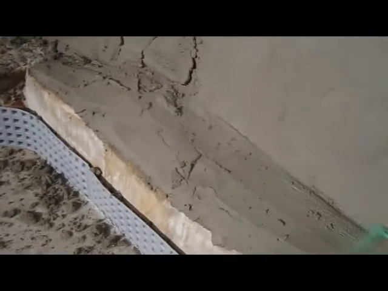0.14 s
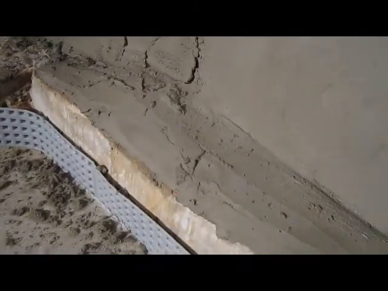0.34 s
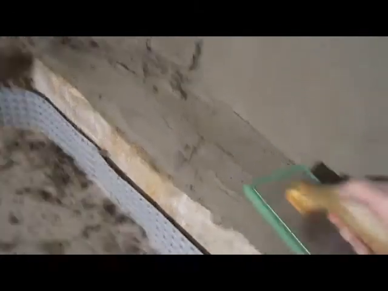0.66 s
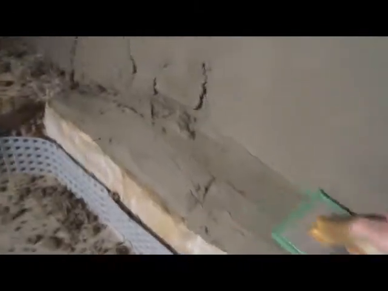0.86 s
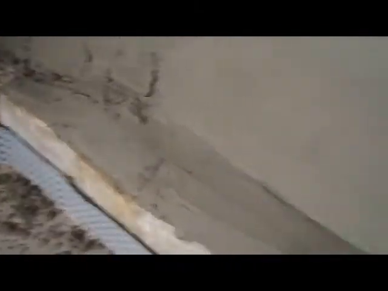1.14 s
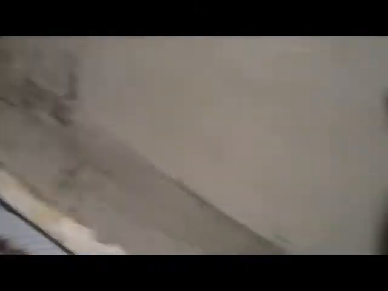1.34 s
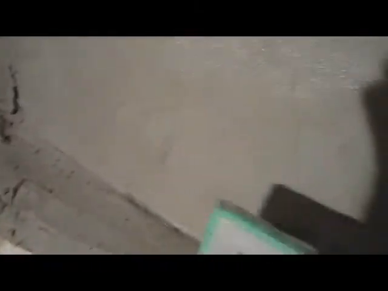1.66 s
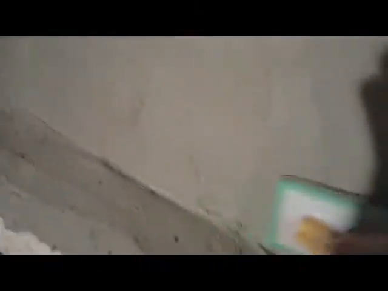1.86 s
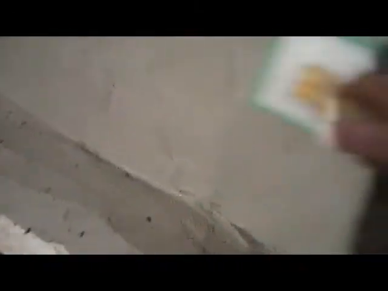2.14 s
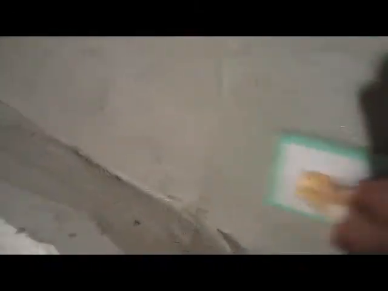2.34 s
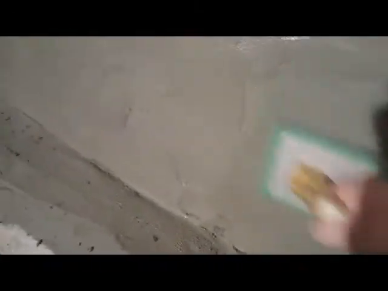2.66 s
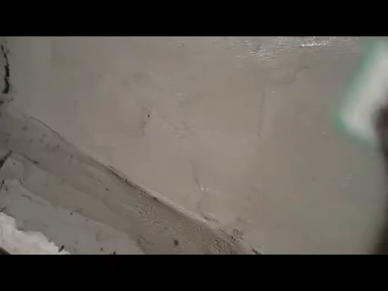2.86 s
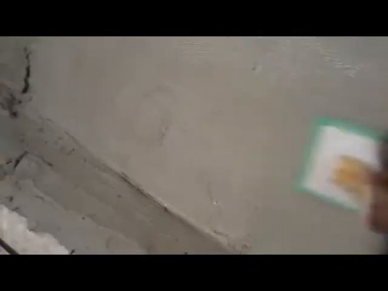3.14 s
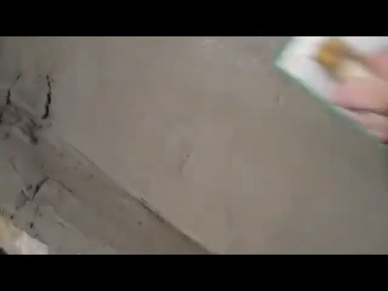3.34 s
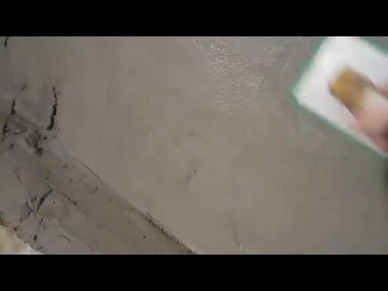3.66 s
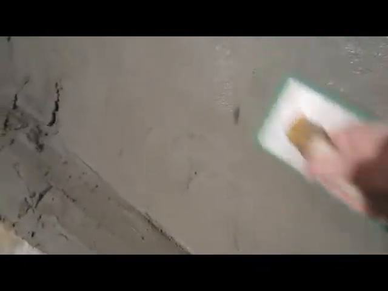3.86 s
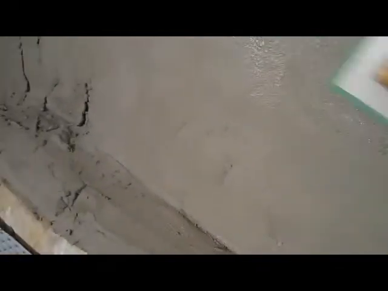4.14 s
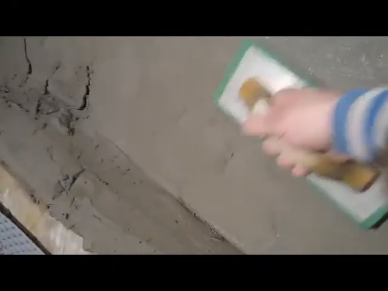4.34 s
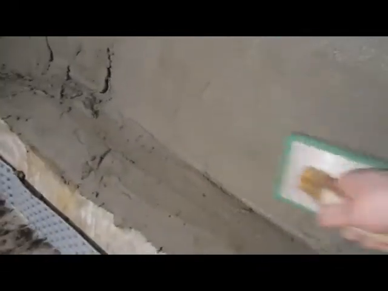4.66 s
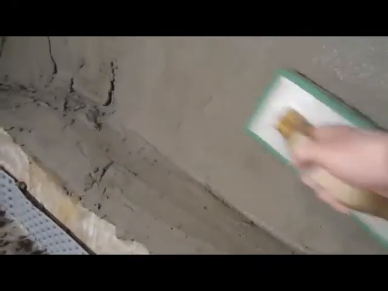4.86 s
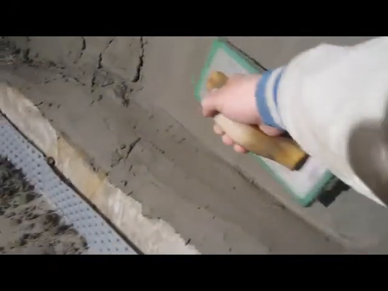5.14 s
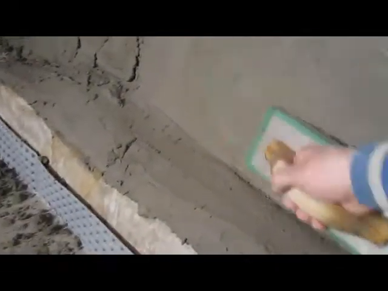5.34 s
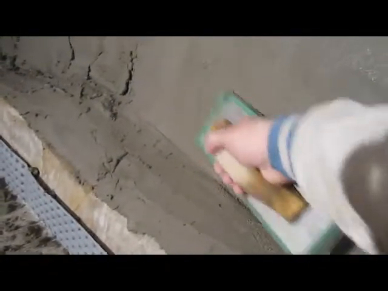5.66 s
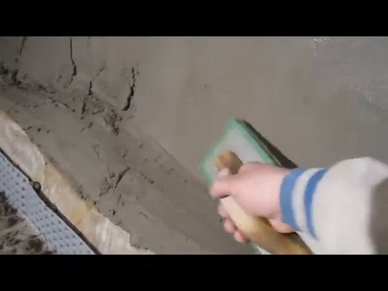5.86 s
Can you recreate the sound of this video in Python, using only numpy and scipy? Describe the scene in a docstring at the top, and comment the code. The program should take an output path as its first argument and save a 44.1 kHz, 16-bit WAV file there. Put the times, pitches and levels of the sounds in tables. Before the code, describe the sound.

Close, sandy rubbing of a float on a cement wall, with light knocks and faint squeaks, then a brief burst of wind buffeting.

```python
"""A basement wall of fresh cement, rubbed in sweeps with a sponge float close to a mono microphone.
Sand grains hiss under the sponge and rattle its plastic plate, which knocks now and then on the wall.
The wet sponge sticks and slips in a faint whistle and brief squeaks; bare walls add a short tail.
Near the end a gust of air buffets the microphone with a loud, dull flutter and two thin ticks."""
import sys
import numpy as np
from scipy import signal
from scipy.fft import rfft, irfft
from scipy.io import wavfile
from scipy.ndimage import map_coordinates

SR = 44100
rng = np.random.default_rng(int(sys.argv[2]) if len(sys.argv) > 2 else 0)


def to_wav(s):
    """Save 16-bit WAV."""
    ch = np.atleast_2d(s).T  # columns
    pcm = np.round(np.clip(ch, -1, 1) * 32767)  # PCM
    wavfile.write(sys.argv[1], SR, pcm.astype(np.int16))


N = 264732
TIME = np.arange(N) / SR


def undb(db):
    """Decibels to gain."""
    return 10 ** (np.asarray(db) / 20)


def unit(x):
    """Scale to rms 1."""
    return x / np.sqrt(np.mean(x ** 2))


def colour(x, points):
    """Filter x by a curve of (Hz, dB) points, to rms 1; clicks keep a sharp front and ring afterwards."""
    hz, db = np.transpose(points)
    freqs = np.maximum(np.fft.rfftfreq(4096, 1 / SR), 1)
    gain = undb(np.interp(np.log(freqs), np.log(hz), db))
    cepstrum = irfft(np.log(gain))
    half = len(cepstrum) // 2
    causal = np.r_[cepstrum[0], 2 * cepstrum[1:half], np.zeros(half)]
    response = irfft(np.exp(rfft(causal)))
    return unit(signal.fftconvolve(x, response)[:N])


def walk(rate):
    """Smooth random drift at rms 1, changing about rate times a second."""
    knots = rng.standard_normal(8192)
    return unit(map_coordinates(knots, [TIME * rate], order=2, mode="wrap"))


def add(out, s, sound):
    """Mix a short sound in at time s."""
    start = int(s * SR)
    out[start:start + len(sound)] += sound[:N - start]


# Spectrum of the basement's still air: (frequency [Hz], relative level [dB])
AIR_SPECTRUM = [(25, 9.5), (80, 4), (160, -1.5), (330, -27), (600, -2), (1200, -3), (4000, -7),
                (12000, -42)]
# Dip of the room tone: (time [s], relative level [dB])
AIR_DIP = [(4.85, 9), (5.1, -23), (5.6, -10.5), (6, 5)]

def room_tone():
    """Still air all around the microphone; it sinks under the gust."""
    gain = undb(-58 + np.interp(TIME, *np.transpose(AIR_DIP)))
    return gain * colour(rng.standard_normal(N), AIR_SPECTRUM)


def swell(t, s, rise_s, fall_s, roundness=1.64):
    """Gain of one sweep of the hand, peaking at time s; roundness 1 is pointed, 2 a bell."""
    away = np.abs(t - s) / np.where(t < s, rise_s, fall_s)
    return np.exp(-np.minimum(away, 10) ** roundness)


# Sweeps of the float, close to the microphone:
# (time of top speed [s], rise [s], fall [s], hiss [dB], rasp [dB], hollow [dB], drag [dB])
FLOAT_STROKES = [(0.197, 0.2, 0.1, -39.0, -43, -47, -45.5), (0.393, 0.349, 0.14, -40, -46.5, -67, -48),
                 (0.64, 0.073, 0.063, -48.5, -48, -49, -41), (0.823, 0.015, 0.13, -52, -63.5, -61, -45.5),
                 (1.07, 0.16, 0.23, -36.5, -43, -53.5, -47.0),
                 (1.305, 0.21, 0.21, -64, -44.5, -65.5, -42.5),
                 (1.388, 0.034, 0.15, -37.5, -26.0, -47.5, -29.5),
                 (1.492, 0.037, 0.059, -32, -30.5, -43, -28),
                 (1.719, 0.029, 0.048, -42.5, -32.5, -38, -29.5),
                 (1.821, 0.056, 0.12, -56, -71, -69.5, -44), (1.977, 0.055, 0.041, -40, -46.0, -53, -47),
                 (2.176, 0.21, 0.14, -35.5, -41.5, -57.5, -47), (2.238, 0.07, 0.41, -34.5, -38, -48, -46.0),
                 (2.545, 0.056, 0.092, -34.5, -52.5, -48.5, -45.5),
                 (2.658, 0.053, 0.13, -34.0, -36, -64, -50.5),
                 (2.79, 0.038, 0.6, -38.5, -56.0, -51.5, -56.5), (3.085, 0.16, 0.11, -33.5, -33, -45, -68),
                 (3.18, 0.046, 0.16, -35, -43, -47, -51.5), (3.391, 0.059, 0.2, -34.5, -37.5, -57, -61),
                 (3.636, 0.17, 0.049, -38.5, -39.5, -46, -53),
                 (4.004, 0.3, 0.096, -34.5, -39.5, -48, -54.5), (4.193, 0.051, 0.068, -38, -43, -44, -48),
                 (4.449, 0.49, 0.23, -35.5, -41, -53, -58), (4.653, 0.064, 0.22, -38.5, -47, -52, -50.5),
                 (4.85, 0.053, 0.25, -47.5, -59, -74, -54), (5.415, 0.25, 0.083, -52, -59, -75, -59),
                 (5.817, 0.072, 0.062, -47, -51.0, -53.5, -53.5),
                 (6.066, 0.16, 0.112, -41, -62, -72.5, -42.0)]

def strokes():
    """Gains of hiss, rasp, hollow and drag follow the hand's speed; overlapping strokes add in power."""
    rows = np.array(FLOAT_STROKES)
    t = TIME[::40]
    speed = np.array([swell(t, *row[:3]) for row in rows])
    return [np.interp(TIME, t, np.sqrt(undb(db) ** 2 @ speed ** 2)) for db in rows[:, 3:].T]


def grains(rate, spread_db):
    """Sand grains catch and slip: random clicks of uneven size, about rate a second."""
    hit = rng.random(N) < rate / SR
    polarity = np.sign(rng.standard_normal(N))
    return hit * polarity * undb(spread_db * np.clip(rng.standard_normal(N), -3, 3))


# Modes of the float's plate: (frequency [Hz], width [Hz], relative level [dB])
PLATE_MODES = [(735, 120, -16), (950, 80, -5.5), (1226, 510, -16), (1480, 200, -18), (2420, 350, -2),
               (2770, 710, 29), (3300, 160, -25), (4020, 150, -34)]

def plate(x):
    """The plastic plate rings in its damped modes."""
    return sum(undb(db) * signal.lfilter(*signal.iirpeak(hz, hz / width, fs=SR), x)
               for hz, width, db in PLATE_MODES)


def wall_echo(x, lag_s=0.000825, echo_db=-13, dull_hz=6000):
    """The pad's faces radiate in opposite phase; the wall returns the rear one late and duller."""
    lag = lag_s * np.exp(0.19 * walk(rate=4))  # the drifting lag gives a moving, hollow colour
    late = map_coordinates(x, [(TIME - lag) * SR], order=3)
    return x - undb(echo_db) * signal.sosfilt(signal.butter(1, dull_hz, fs=SR, output="sos"), late)


# Friction spectra of fine sand, coarse sand and pad, close up: (frequency [Hz], relative level [dB])
HISS_SPECTRUM = [(1500, -13.5), (2800, -9), (4200, -3.5), (5800, -1), (8000, -2), (10500, -4),
                 (13000, -7.5), (15300, -15.5)]
RASP_SPECTRUM = [(400, -14), (700, -7.5), (950, -2), (1300, 2), (2000, 0), (3000, -2), (4500, -3.5),
                 (8000, -25.5)]
DRAG_SPECTRUM = [(30, -18), (60, -33), (100, -7.5), (200, -2.5), (310, 2.5), (470, 2.5), (660, -3.5),
                 (870, -1.5), (1200, -8.5), (2000, -42.5)]

def rubbing(hiss_gain, rasp_gain, press):
    """Fine sand hisses, coarse sand rasps and rings the plate, the pressed pad drags underneath."""
    catch = walk(rate=51)  # the whole pad grips and lets go unevenly
    fine = colour(grains(rate=20000, spread_db=0.5), HISS_SPECTRUM) * undb(0.89 * catch)
    rattle = unit(plate(grains(rate=2100, spread_db=14)))
    coarse = colour(grains(rate=7000, spread_db=1.5), RASP_SPECTRUM)
    flicker_db = 1.07 * walk(rate=48) + 1.44 * walk(rate=18)
    rasp = unit(coarse + undb(-10.5) * rattle) * undb(flicker_db + 1.3)
    drag = colour(grains(rate=2500, spread_db=4.5), DRAG_SPECTRUM) * undb(0.93 * catch - 1.0)
    smother = np.clip(press / undb(-32), 0, 1)  # bearing down hard smothers the finest hiss
    dull = signal.sosfilt(signal.butter(1, 5500, fs=SR, output="sos"), fine)
    hiss = fine + smother * (undb(9.5) * dull - fine)
    return wall_echo(hiss * hiss_gain + rasp * rasp_gain) + drag * press


# The hollow under the plate tightens as the hand tilts it: (time [s], resonance [Hz])
HOLLOW_TUNING = [(.2, 1498), (2.25, 1261), (3.15, 1256), (3.62, 1407), (3.95, 1586), (4.6, 1593),
                 (5.8, 1403)]

def hollow(width_hz=480, upper_ratio=2.05, upper_db=-5):
    """Sand noise in the two broad, moving resonances under the plate."""
    hz = np.interp(TIME, *np.transpose(HOLLOW_TUNING))
    phase = 2 * np.pi * np.cumsum(hz) / SR
    lower, upper = (walk(width_hz) * np.sin(ratio * phase) + walk(width_hz) * np.cos(ratio * phase)
                    for ratio in (1, upper_ratio))
    return lower + undb(upper_db) * upper


def glide(s, half_s, top_hz, slowing=.21):
    """Passing rate of the pores and gain in one glide: both arch with the hand's speed."""
    away = np.minimum(((TIME - s) / half_s) ** 2, 10)
    return top_hz * np.exp(-slowing * away), np.exp(-away ** 2)


# Light glides over the wall: (time of top speed [s], half length [s], top passing rate [Hz], level [dB])
LIGHT_GLIDES = [(.2, .19, 2920, -58), (1.89, .13, 2750, -59), (5.99, .11, 2960, -48)]
# Bands in which the pores sing: (multiple of the passing rate [ratio], relative level [dB])
PORE_BANDS = [(2.15, -3), (2.4, -3), (2.62, 0), (2.75, -3), (3.55, -4), (3.8, -1), (4, 0), (4.2, -1),
              (4.45, -2), (4.7, -2), (4.9, -5)]

def pores():
    """The sponge's pore pattern gives faint, thin bands that rise and fall with the hand's speed."""
    bands = [(multiple, undb(db) * (1.5 + walk(rate=70))) for multiple, db in PORE_BANDS]
    rms = np.sqrt(sum(np.mean(band ** 2) for _, band in bands) / 2)
    out = np.zeros(N)
    for s, half_s, top_hz, db in LIGHT_GLIDES:
        hz, gain = glide(s, half_s, top_hz)
        on = np.abs(TIME - s) < 2 * half_s
        phase = 2 * np.pi * np.cumsum(hz[on]) / SR
        singing = sum(band[on] * np.sin(multiple * phase) for multiple, band in bands) / rms
        out[on] += undb(db) * gain[on] * singing
    return out


def whistle(overtone_db=2):
    """The wet sponge sticks and slips in a thin, unsteady tone that arches with the first glide."""
    hz, gain = glide(*LIGHT_GLIDES[0][:3])
    phase = 2 * np.pi * np.cumsum(hz * (1 + .012 * walk(rate=200))) / SR
    tone = np.sin(phase) + undb(overtone_db) * gain * np.sin(2 * phase)  # brightest at top speed
    return undb(-50.5) * gain * tone * (1.35 + .55 * walk(rate=80))


def basement(x, t60_s=0.22, wet_db=-9):
    """Bare walls return a short, diffuse tail behind the close sound."""
    t = np.arange(SR // 2) / SR
    tail = rng.standard_normal(len(t)) * np.exp(-np.log(1000) * t / t60_s) * (t > .004)
    return x + undb(wet_db) * signal.fftconvolve(x, tail / np.linalg.norm(tail))[:N]


# The plate meets the wall, close by: (time [s], level [dB], thump relative to the knock [dB])
PLATE_KNOCKS = [(0.4882, -23.5, -18), (0.65, -21.5, 5.5), (0.654, -23, -28), (0.675, -32, 2),
                (0.696, -25, -10), (.718, -26.5, -7), (0.732, -31, 0.5), (.816, -15, -34),
                (1.342, -29.5, 3), (1.41, -11, -9), (1.466, -13.5, 0.5), (4.174, -37, 3),
                (4.556, -35.5, 15)]

def knocks(slap_hz=1300, slap_s=0.0018, thump_hz=170, thump_s=0.0016, crunch_s=0.0057, cushion_hz=3200):
    """Each knock is a short slap, a crunch of sand, the ring of the plate and a soft thump of the pad."""
    t = np.arange(SR // 10) / SR
    ring = plate(signal.unit_impulse(len(t)))
    slap = np.sin(2 * np.pi * slap_hz * t) * np.exp(-t / slap_s)
    tock = slap + undb(-6) * ring / np.abs(ring).max()
    thump = np.sin(2 * np.pi * thump_hz * t) * np.exp(-t / thump_s)
    sand_band = signal.butter(2, [1700, 3100], "bandpass", fs=SR, output="sos")
    out = np.zeros(N)
    for s, db, thump_db in PLATE_KNOCKS:
        crunch = unit(signal.sosfilt(sand_band, rng.standard_normal(len(t)))) * np.exp(-t / crunch_s)
        add(out, s, undb(db) * (tock + undb(-15) * crunch + undb(thump_db) * thump))
    # the sponge cushions every contact
    return signal.sosfilt(signal.butter(2, cushion_hz, fs=SR, output="sos"), out)


# Brief squeaks of the sponge on the wall: (time [s], length [s], pitch [Hz], level [dB])
SPONGE_SQUEAKS = [(1.296, 0.018, 3140, -35.5), (1.388, 0.057, 3160, -35), (1.654, 0.014, 2240, -42.5),
                  (2.647, .04, 2140, -41), (3.026, 0.12, 2455, -39.5), (4.16, 0.065, 2080, -42.5)]

def squeaks():
    """For a moment the pad sticks and slips at a roughly steady rate."""
    tones = (undb(db) * np.exp(-2 * ((TIME - s) / length) ** 2) * np.sin(2 * np.pi * hz * TIME)
             for s, length, hz, db in SPONGE_SQUEAKS)
    return np.sqrt(2) * walk(rate=420) * sum(tones)


# Air right on the microphone: (start [s], length [s], rumble [dB], flutter at mid-puff [dB])
AIR_PUFFS = [(4.857, 0.587, -23, -43), (5.529, .06, -27.5, -53)]

def puffs(attack_s=.014, release_s=.011, sag_db_per_s=10.5, arch_db=13.5):
    """Gains of rumble and flutter: within each puff the rumble sags while the flutter arches."""
    rumble, flutter = 0, 0
    for start, length, rumble_db, flutter_db in AIR_PUFFS:
        age = TIME - start
        held = np.clip(age, 0, length)
        gate = np.exp(np.minimum(age, 0) / attack_s - np.maximum(age - length, 0) / release_s)
        rumble += gate * undb(rumble_db - sag_db_per_s * held)
        flutter += gate * undb(flutter_db - arch_db * (2 * held / length - 1) ** 2)
    return rumble, flutter


def small_eddies(flutter_gain, count=130, over_db=7, centre_hz=680, brighten=0.026, scatter_db=3):
    """Stronger flutter sheds louder, brighter eddies: (time [s], level [dB], centre [Hz])."""
    jitter, size, pitch = rng.standard_normal((count, 3)).T
    last_start, last_length = AIR_PUFFS[-1][:2]
    times = np.linspace(AIR_PUFFS[0][0], last_start + last_length, count) + .003 * jitter
    db = 20 * np.log10(np.interp(times, TIME, flutter_gain))
    hz = centre_hz * np.exp(.2 * pitch + brighten * (db - np.median(db)))
    return list(zip(times, db + over_db + scatter_db * np.clip(size, -2, 1), hz))


# The strongest eddies to hit the microphone: (time [s], level [dB], centre [Hz], wake length [s])
STRONG_EDDIES = [(4.8803, -12, 430, 0.0023), (4.887, -6, 359, 0.003), (4.904, -8, 241, .005),
                 (4.937, -2, 370, 0.0052), (4.953, -7, 234, 0.0031), (4.979, -5.5, 378, 0.0047),
                 (4.991, -8, 160, 0.0049), (4.997, -7, 526, 0.0089), (5.006, -17, 885, 0.0017),
                 (5.019, -3, 780, 0.0022), (5.0437, -13, 696, 0.0016), (5.048, -2, 990, 0.0033),
                 (5.065, -13.5, 800, 0.013), (5.083, -9, 616, 0.0051), (5.121, -15, 710, 0.017),
                 (5.155, -13.5, 560, 0.014), (5.189, -6.5, 650, .004), (5.199, -10.5, 600, .004),
                 (5.204, -10.5, 1400, 0.0047), (5.229, -12.5, 780, .012), (5.249, -17.5, 700, 0.014),
                 (5.267, -6, 946, .004), (5.272, -10.5, 1230, 0.0034), (5.29, -19.5, 380, .03),
                 (5.34, -7, 500, 0.011), (5.36, -21.5, 420, 0.016), (5.396, -22, 427, 0.0028),
                 (5.410, -18.5, 483, .005), (5.445, -17, 600, 0.0045), (5.524, -29.5, 300, 0.0021),
                 (5.549, -24, 400, 0.0055), (5.562, -17, 402, 0.0024)]

def eddies(flutter_gain):
    """Each eddy, strong or small, passes the microphone as one swing of pressure."""
    reach = SR // 50
    t = np.arange(-reach, reach) / SR
    out = np.zeros(N)
    for s, db, hz, *_ in STRONG_EDDIES + small_eddies(flutter_gain):
        passage = np.pi * hz * t  # a small eddy passes faster and sounds brighter
        swing = passage / (1 + passage ** 2 / 5) ** 6
        add(out, s - reach / SR, undb(db) * rng.choice([-1, 1]) * swing / swing.max())
    return out


def wakes(front_share=0.49, growth_db_per_db=0.51, split_hz=398):
    """Gains of rumble and flutter in the churned air at each strong eddy: steep front, longer trail."""
    rumble, flutter = np.zeros(N), np.zeros(N)
    t = np.arange(-SR // 20, SR // 20) / SR
    for s, db, hz, length in STRONG_EDDIES:
        width_s = np.where(t < 0, front_share * length, length)
        wake = undb(growth_db_per_db * db) * np.exp(-(t / width_s) ** 2)
        slow = 1 / (1 + (hz / split_hz) ** 3)  # slow eddies stir mostly rumble, fast ones flutter
        add(rumble, s + t[0], undb(-11) * slow * wake)
        add(flutter, s + t[0], undb(-19) * (1 - slow) * wake)
    return rumble, flutter


# Spectra of wind on the microphone: (frequency [Hz], relative level [dB])
RUMBLE_SPECTRUM = [(20, -17), (42, 3), (75, 4), (150, 1.5), (300, -2.5), (500, -14.5), (800, -24.5),
                   (1500, -71)]
FLUTTER_SPECTRUM = [(200, -1), (500, 1.5), (850, -2), (1300, -10), (2000, -23), (3000, -33.5),
                    (5000, -59.5)]

def gust():
    """Turbulent air on the microphone port: a flapping rumble, a flutter and passing eddies."""
    rumble = unit(colour(rng.standard_normal(N), RUMBLE_SPECTRUM) * undb(3 * walk(rate=75)))
    flutter = unit(colour(rng.standard_normal(N), FLUTTER_SPECTRUM) * undb(4 * walk(rate=160)))
    rumble_gain, flutter_gain = np.add(puffs(), wakes())
    return rumble * rumble_gain + undb(-2) * flutter * flutter_gain + eddies(flutter_gain)


# Overload crackle, then grit, during the gust: (time [s], level [dB])
GUST_TICKS = [(5.048, -25), (5.534, -29.5)]

def ticks(decay_s=0.00053):
    """Two thin, sharp ticks in the gust: a crackle of overload on a loud eddy, then a tick of grit."""
    t = np.arange(SR // 100) / SR
    tones = sum(np.sin(2 * np.pi * hz * t) for hz in (3700, 5600, 9000))
    out = np.zeros(N)
    for s, db in GUST_TICKS:
        add(out, s, undb(db) * tones / 2 * np.exp(-t / decay_s))
    return out


def scene():
    """The float sounds in the room; the gust acts on the microphone alone and has no tail."""
    still_air = room_tone()
    hiss_gain, rasp_gain, hollow_gain, press = strokes()
    friction = undb(-0.72) * rubbing(hiss_gain, rasp_gain, press) + hollow_gain * hollow()
    sponge_float = friction + pores() + whistle() + squeaks() + knocks()
    mono = basement(sponge_float) + gust() + ticks() + still_air
    return np.array([mono, mono])


def record(dry, low_hz=32, top_hz=15450):
    """The recorder drops the deepest rumble, rounds the highest peaks and cuts the top."""
    rounded = np.tanh(signal.sosfilt(signal.butter(2, low_hz, "highpass", fs=SR, output="sos"), dry))
    return signal.sosfilt(signal.ellip(10, .1, 80, top_hz, fs=SR, output="sos"), rounded)


dry = scene()
out = record(dry)
to_wav(out)
```